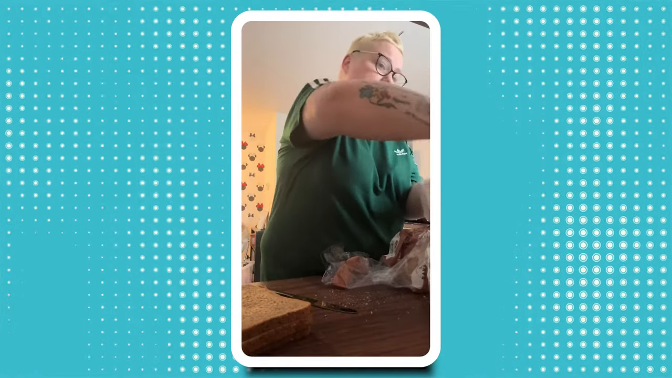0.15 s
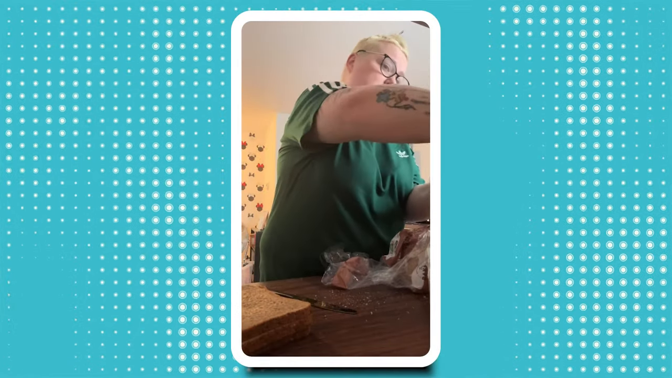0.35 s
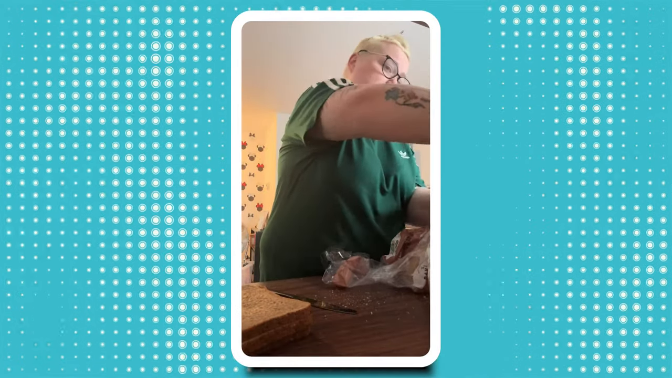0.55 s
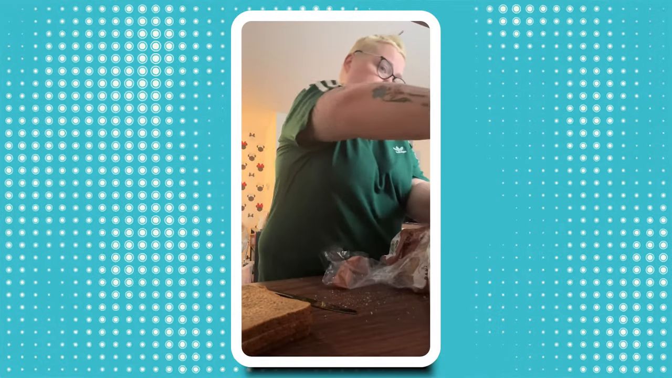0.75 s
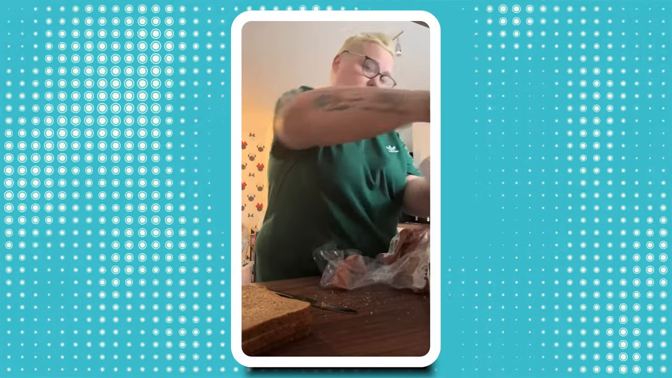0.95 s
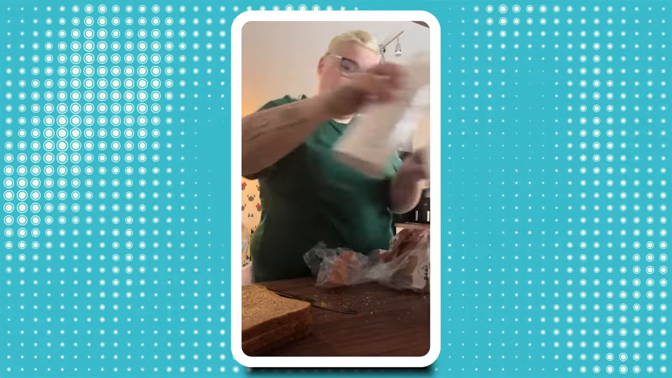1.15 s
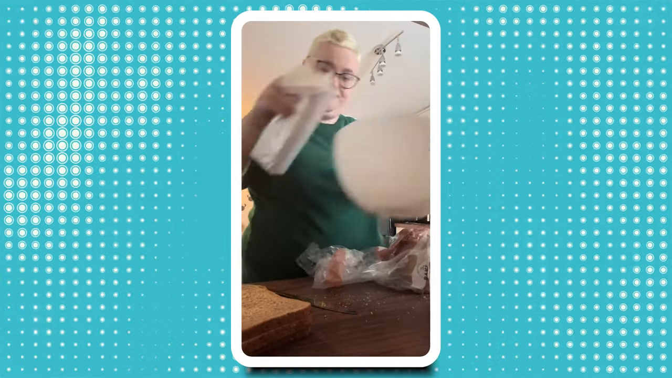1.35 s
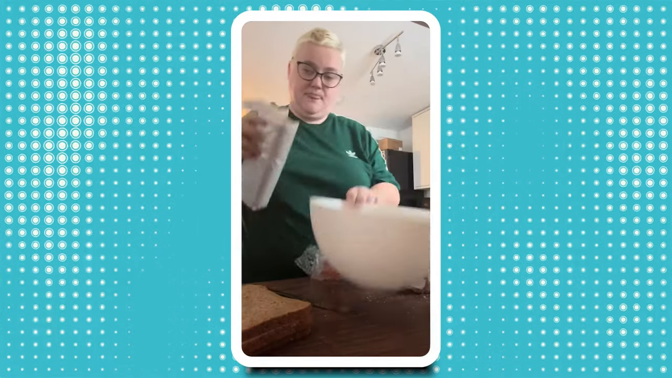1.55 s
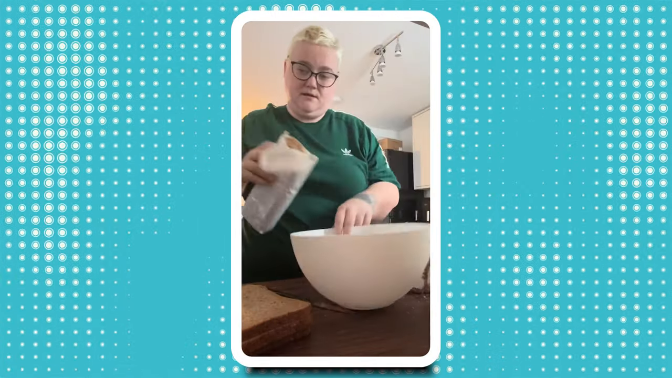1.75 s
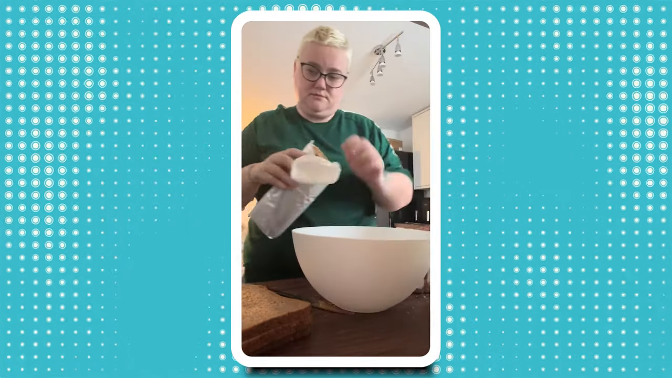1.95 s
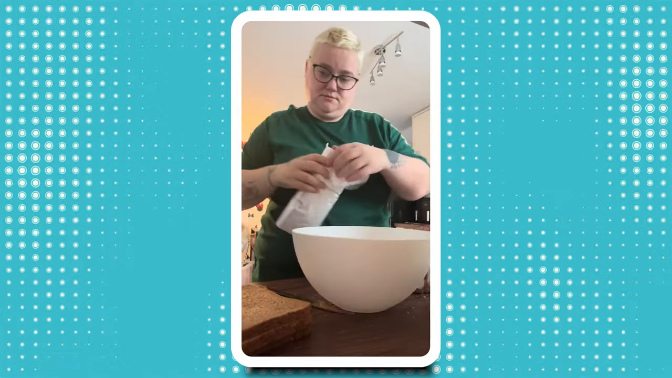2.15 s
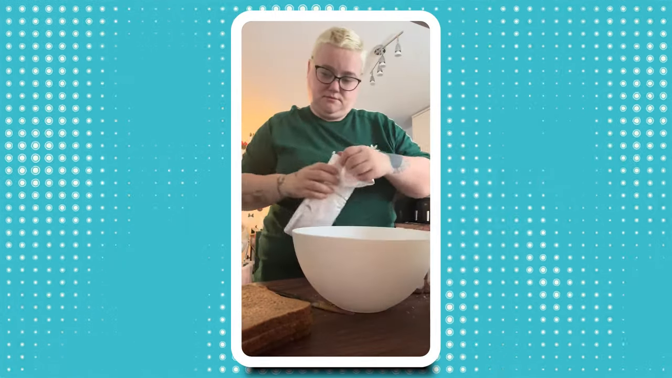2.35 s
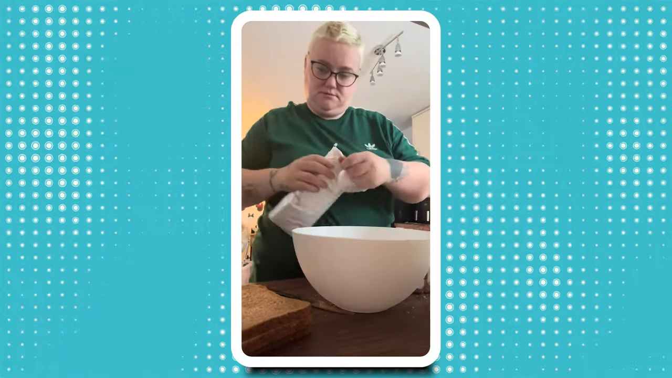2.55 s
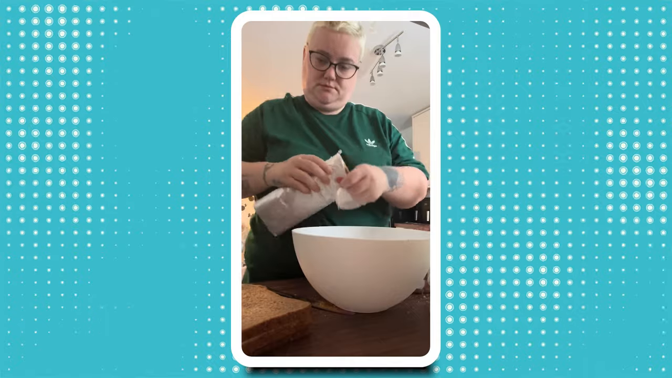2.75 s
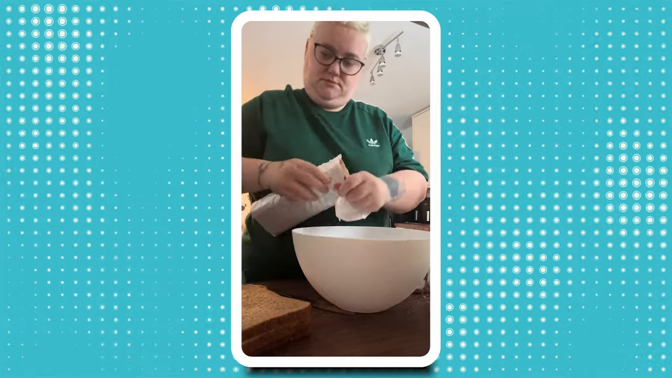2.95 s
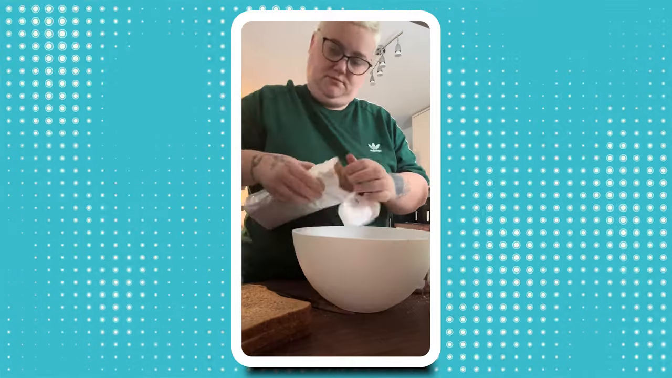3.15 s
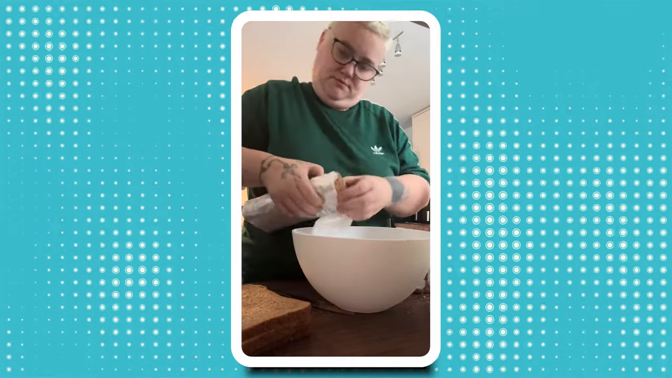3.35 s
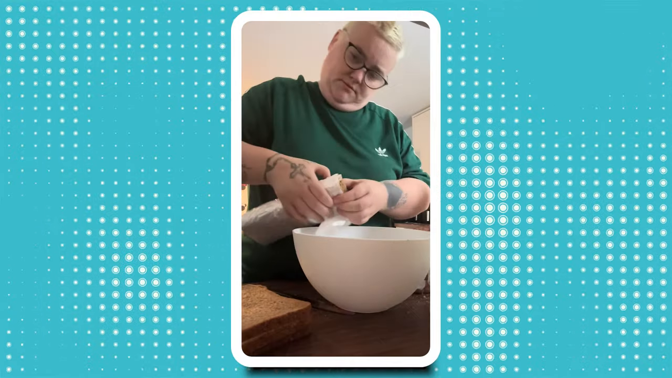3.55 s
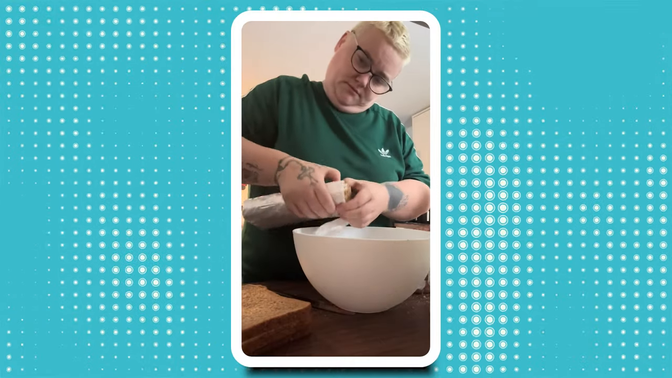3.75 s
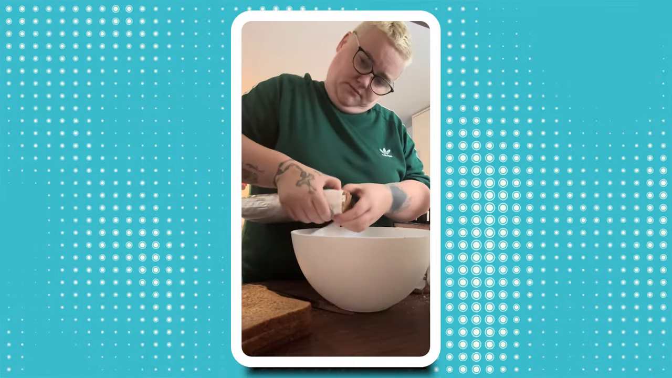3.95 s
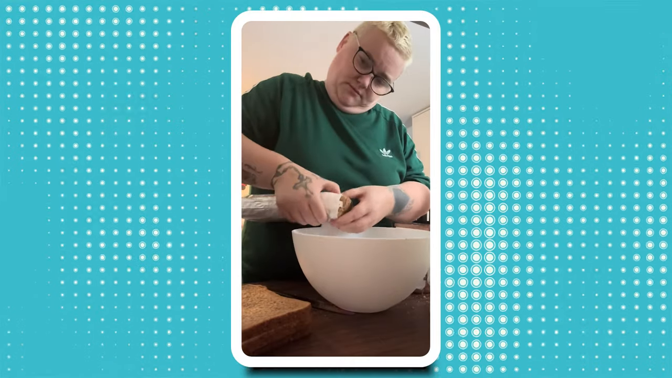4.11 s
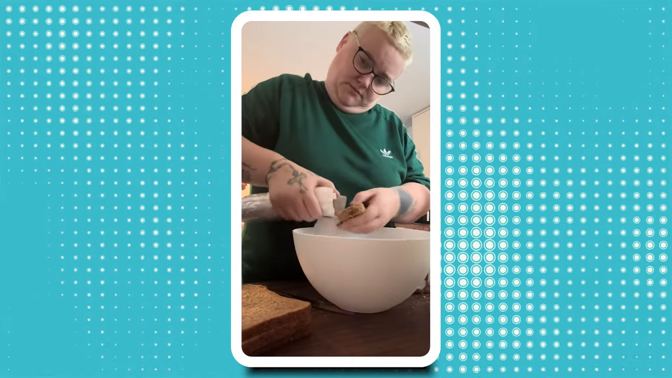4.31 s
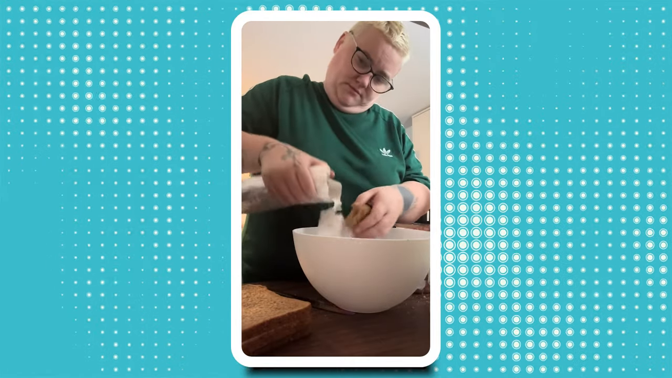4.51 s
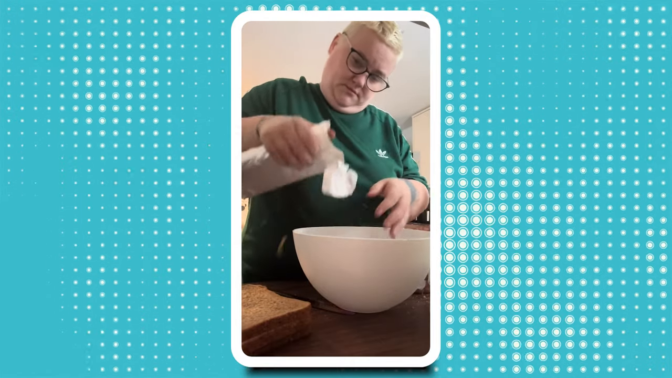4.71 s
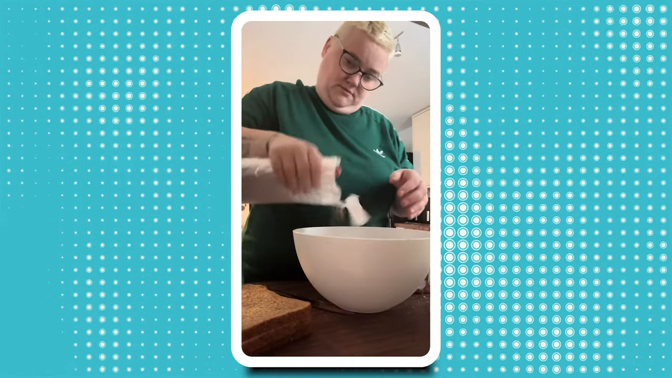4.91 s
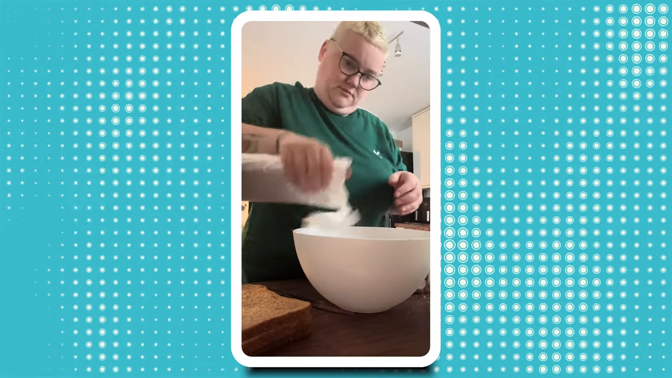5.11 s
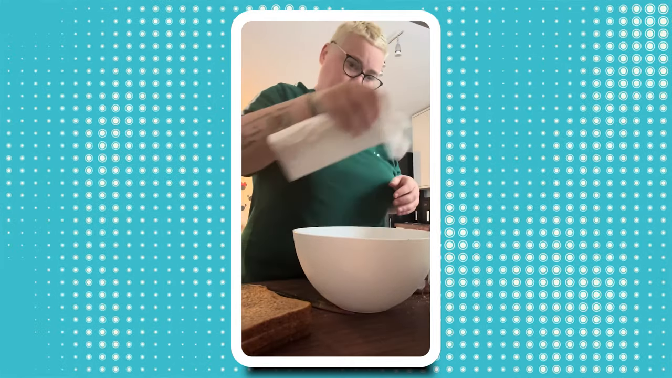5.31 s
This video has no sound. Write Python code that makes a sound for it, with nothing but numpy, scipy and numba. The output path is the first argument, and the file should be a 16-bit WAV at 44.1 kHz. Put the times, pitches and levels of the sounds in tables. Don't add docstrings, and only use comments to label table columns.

```python
import sys
import numpy as np
from scipy import signal
from scipy.fft import rfft, irfft, next_fast_len
from scipy.io import wavfile
from scipy.ndimage import uniform_filter1d
from numba import njit

SR = 44100
rng = np.random.default_rng(int(sys.argv[2]) if len(sys.argv) > 2 else 0)


def gain_from_decibels(decibels):
    exponent = np.asarray(decibels, float) / 20
    return 10 ** exponent


def wrap_up_sound(samples):
    columns = np.atleast_2d(samples).T
    tamed = np.clip(columns, -1, 1)
    steps = np.round(tamed * 32767).astype(np.int16)
    wavfile.write(sys.argv[1], SR, steps)


N = 241491


def colour(x, points):
    hz, db = np.transpose(points)
    size = next_fast_len(N)
    f = np.maximum(np.arange(size // 2 + 1) * SR / size, 1)
    gain = gain_from_decibels(np.interp(np.log(f), np.log(hz), db))
    return irfft(rfft(x, size) * gain, size)[..., :N]


def band(x, lo_hz, hi_hz):
    y = signal.sosfilt(signal.butter(2, [lo_hz, hi_hz], "band", fs=SR, output="sos"), x)
    return y / np.sqrt(np.mean(y ** 2))


@njit
def rings(start, hz, t60, rise, gain):
    out = np.zeros(N)
    for k in range(len(start)):
        turn = np.exp(2j * np.pi * hz[k] / SR - np.log(1000) / (t60[k] * SR))
        z, unrisen = gain[k] + 0j, 1.
        fade = np.exp(-1 / (rise[k] * SR))
        for i in range(int(start[k] * SR), min(N, int((start[k] + t60[k]) * SR))):
            z, unrisen = z * turn, unrisen * fade
            out[i] += (1 - unrisen) * z.imag
    return out


def bursts(s, db, t60, rise):
    env = np.zeros(N + SR)
    t = np.arange(SR // 5) / SR
    for start, g, fall in zip((s * SR).astype(int), gain_from_decibels(db), np.clip(t60, .008, .2)):
        env[start:start + len(t)] += g * (1 - np.exp(-t / rise)) * gain_from_decibels(-60 * t / fall)
    return env[:N]


def grains(lo_hz, hi_hz, cycles, spread_db, count):
    when, pitch, size = rng.random((count, 3)).T
    hz = lo_hz * (hi_hz / lo_hz) ** pitch
    gain = gain_from_decibels(spread_db * np.minimum(-np.log(1 - size), 3.5))
    y = rings(when * N / SR, hz, cycles / hz, .5 / hz, gain)
    return y / np.sqrt(np.mean(y ** 2))


def held(s, length, db, attack, release):
    t = np.arange(N) / SR
    total = 0
    for start, hold, g in zip(s, length, gain_from_decibels(db)):
        end = start + max(hold, attack)
        total = total + g * np.interp(t, [start, start + attack, end, end + release], [0, 1, 1, 0])
    return total


def household_hum():
    # (f/Hz, level/dB)
    spectrum = [(20, -38), (36, 0), (50, 16), (75, 6), (110, 13), (250, -1), (550, -13), (1100, -17),
                (1600, -13.5), (1950, -0.5), (2500, -11.5), (4000, -15), (7000, -19.5), (9000, -14)]
    hum = colour(rng.standard_normal((2, N)), spectrum)
    return hum * gain_from_decibels(-47.5) / np.sqrt(np.mean(hum ** 2))


def kitchen(x, t60=0.25, wet_db=-14):
    t = np.arange(int(.3 * SR)) / SR
    tail = rng.standard_normal((2, len(t))) * gain_from_decibels(-60 * t / t60) * (t > .003)
    tail /= np.sqrt(np.sum(tail ** 2, axis=1, keepdims=True))
    shared, unshared = gain_from_decibels(wet_db) * signal.fftconvolve(x[None], tail, axes=1)[:, :N]
    return shared, gain_from_decibels(11.0) * unshared


def counter():
    # (t/s, peak level/dB, ring f/Hz, t60/s)
    blows = [(0.774, -40, 152, 0.083), (0.797, -34.5, 200, 0.083), (0.811, -37, 210, 0.069),
             (0.825, -34.5, 210, 0.073), (0.931, -24, 118, 0.17), (1.644, -34, 222, 0.1),
             (1.654, -17, 127.4, 0.094), (1.7, -21.5, 135, 0.14), (1.735, -38, 140, 0.1),
             (1.789, -44, 134, 0.24), (1.848, -31.5, 143, 0.44), (1.979, -38, 145, 0.27),
             (2.17, -52, 147, 0.086), (2.398, -32.5, 168, 0.017), (3.078, -48, 94.5, 0.053),
             (3.566, -37, 138, 0.24), (3.62, -37, 136.3, 0.24), (4.135, -31, 128, 0.12),
             (4.615, -17.5, 125.5, 0.08), (4.653, -31.5, 122.6, 0.21), (4.701, -29, 142, 0.1),
             (4.72, -27, 140, 0.093), (4.744, -26, 135.3, 0.098)]
    # (start t/s, length/s, board rumble level/dB, scuff level/dB)
    slides = [
        (0.777, 0.04, -49, -43),
        (0.86, 0.025, -60, -44.5),
        (1.618, 0.13, -39, -43.5),
        (1.826, 0.13, -43.5, -49.5),
        (4.61, .05, -48, -44),
        (4.712, 0.072, -37, -60),
    ]
    s, db, hz, t60 = np.transpose(blows)
    t60 = np.clip(t60, .02, .4)
    thud = rings(s, hz, t60, 0.3 / hz, gain_from_decibels(db + 5))
    thud = thud + rings(s, 1.17 * hz, 1.66 * t60, 0.3 / hz, gain_from_decibels(db - 10.5))
    rumble = band(band(rng.standard_normal(N), 78, 167), 89, 147)
    scuff = grains(190, 235, 10., 2., count=900)
    s, length, rumble_db, scuff_db = np.transpose(slides)
    attack_s, release_s = 0.0084, 0.12
    thud = thud + held(s, length, rumble_db, attack_s, release_s) * rumble
    thud = thud + held(s, length, scuff_db, attack_s, release_s) * scuff
    return colour(thud, [(25, -43.5), (70, 6.0)])


def knocks():
    # (t/s, peak level/dB, ring f/Hz, t60/s)
    taps_and_pops = [(0.178, -44.5, 945, 0.05), (0.922, -33.5, 423, 0.023), (1.361, -35.5, 474, 0.045),
                     (1.408, -38, 436, 0.04), (1.415, -27.5, 424, 0.082), (1.444, -34, 493, 0.081),
                     (1.473, -30, 476, 0.044), (1.645, -13.5, 449, 0.031), (1.694, -12, 466, 0.016),
                     (1.721, -24.5, 433, 0.024), (1.828, -32.5, 620, 0.043), (1.845, -33, 890, 0.035),
                     (1.857, -28, 537, 0.015), (1.971, -37.5, 616, 0.025), (2.35, -37, 450, 0.017),
                     (2.408, -29, 486, 0.016), (2.685, -35.5, 543, 0.016), (2.797, -24, 1150, 0.0056),
                     (2.947, -40.5, 1150, 0.031), (3.08, -37.5, 544, 0.015), (3.238, -40.5, 654, 0.016),
                     (3.439, -28, 684, 0.011), (3.572, -42, 657, 0.033), (3.646, -29.5, 535, 0.015),
                     (4.118, -38, 458, 0.059), (4.198, -33, 665, 0.0093), (4.274, -34.5, 1230, 0.018),
                     (4.307, -47, 534, 0.17), (4.608, -13, 670, 0.0097), (4.663, -40.5, 523, 0.042),
                     (4.699, -35, 694, 0.065), (4.738, -20, 400, 0.015), (5.423, -39.5, 556, 0.012),
                     (0.368, -38, 1010, 0.019), (0.133, -38, 700, 0.01), (0.567, -39.5, 570, 0.014),
            (0.677, -44.5, 850, 0.023), (0.773, -49, 670, 0.069), (0.81, -44, 620, 0.069),
            (0.8502, -21.5, 1700, 0.0082), (1.045, -55, 493, 0.03), (1.15, -56, 447, 0.06),
            (1.235, -54, 510, 0.036), (1.805, -38, 560, 0.035), (0.855, -48, 660, 0.056),
            (0.88, -47, 620, 0.04), (1.748, -37, 960, 0.013), (1.383, -36, 473, 0.05),
            (1.829, -25.5, 2070, 0.078), (1.85, -30, 2070, 0.061), (2.175, -44, 514, 0.063),
            (2.47, -35.5, 1030, 0.015), (2.5, -42.5, 720, 0.025), (2.549, -44, 550, 0.018),
            (2.841, -41.5, 1200, 0.029), (2.961, -43, 812, 0.04), (3.11, -43, 674, 0.025),
            (3.278, -41.5, 620, 0.017), (3.3257, -32, 1780, 0.005), (3.724, -47, 580, 0.054),
            (3.779, -41.5, 647, 0.032), (4.125, -27.5, 1330, 0.018), (4.475, -44, 1120, 0.016),
            (4.495, -44, 1270, 0.024), (4.608, -9.5, 1150, 0.0063), (4.613, -31, 830, 0.035),
            (4.631, -38, 3090, 0.027), (4.753, -34, 560, 0.016), (5.24, -52, 620, 0.018),
            (5.301, -44.5, 580, 0.022), (5.4363, -23.5, 2230, 0.011), (5.436, -28, 5530, 0.0071)]
    s, db, hz, t60 = np.transpose(taps_and_pops)
    t60 = np.clip(t60, .005, .3)
    overtone = rings(s, 1.45 * hz, 0.6 * t60, 1.1 / hz, gain_from_decibels(db - 5))
    return rings(s, hz, t60, 0.42 / hz, gain_from_decibels(db + 8)) + overtone


def bowl(modes, hits):
    s, db, hard_db = np.transpose(hits)
    spot = 2 * rng.random((len(s), len(modes))) - 1
    one = np.ones(len(s))
    out = 0
    for k, (hz, mode_db, t60) in enumerate(modes):
        level = db - 7.0 + mode_db + 2 * spot[:, k - 1] + hard_db * np.log2(hz / 600)
        pitch = hz * (1 + 0.0072 * spot[:, k])
        out = out + rings(s, pitch, min(t60, .044) * one, 0.0013 * one, gain_from_decibels(level))
    return out


def bowl_set_down():
    # (f/Hz, level/dB, t60/s)
    modes = [(312, 8, 0.029), (474, -2, 0.11), (568, -5, 0.062), (795, 2, 0.016), (1150, -16.5, 0.027),
             (2070, -13.5, 0.088), (2624, -4.5, 0.015), (2960, -7.5, 0.0097)]
    # (t/s, peak level/dB, hardness/dB)
    hits = [
        (1.644, -3.5, 4.5),
        (1.694, -10, 4.5),
        (1.72, -27, -3),
    ]
    return bowl(modes, hits)


def biscuit_drop():
    # (f/Hz, level/dB, t60/s)
    modes = [(268, 6.5, 0.078), (495, -5, 0.093), (670, 6, 0.031), (1150, -31, 0.085), (1240, -22, 0.013),
             (1900, -29, .04), (2385, -9, 0.2), (3020, -3.5, 0.012)]
    # (t/s, peak level/dB, hardness/dB)
    hits = [
        (4.607, -9.5, 5),
        (4.633, -20, 9),
        (4.698, -18.5, 4.5),
        (4.736, -24, 10),
    ]
    return bowl(modes, hits)


def grip_gains():
    # (start t/s, length/s, force level/dB, film brightness re force/dB, papery flex re force/dB)
    grips = [(0, 0.037, -44.5, -5, -20), (0.089, 0.19, -46.5, -3.5, -4.5), (0.225, 0.3, -40, -3, -12),
             (0.499, 0.25, -49, -1, -3.5), (0.774, 0.17, -43, -9.5, -7), (0.898, 0.076, -51, -2, -20),
             (0.974, 0.33, -58.5, -8, -2.5), (1.3, 0.23, -46.5, -6, -5.5), (1.477, 0.15, -42.5, -3, 3),
             (1.602, 0.287, -48, -13.5, 9.5), (1.868, 0.16, -54, -40, 1.5), (2.124, 0.22, -40, -1, -2.5),
             (2.315, 0.33, -45, 1, -3), (2.657, 0.44, -49, 2, -6), (2.96, 0.17, -47.5, -7.5, -5),
             (3.169, 0.44, -43, -1, -4.5), (3.55, 0.35, -42.5, 1, -6.5), (3.879, 0.11, -39, 1, -16),
             (4.001, 0.17, -38, 2, -8.5), (4.133, 0.23, -43, -3.5, -2.5), (4.366, 0.18, -49, -0.5, -35),
             (4.562, 0.21, -39.5, -21, -37), (4.781, 0.2, -49.5, 1.5, -39), (5.023, 0.11, -55, 7, -5),
             (5.16, 0.05, -55, 1, -23), (5.33, 0.13, -71.5, 16, -26)]
    s, length, db, film_db, flex_db = np.transpose(grips)
    attack_s, release_s = 0.045, 0.019
    creasing = gain_from_decibels(-66.5) + held(s, length, db, attack_s, release_s)
    sliding = gain_from_decibels(-70.5) + held(s, length, db + film_db, attack_s, release_s)
    flexing = gain_from_decibels(-68) + held(s, length, db + flex_db, attack_s, release_s)
    return creasing, sliding, flexing


def snaps():
    # (t/s, peak level/dB, ring f/Hz, bright edge re peak/dB)
    fetch = [(0.1138, -30.5, 1620, -9), (0.1545, -38, 1620, -30), (0.3465, -20, 1670, -12),
             (0.368, -19.5, 1960, -37), (0.4836, -21.5, 2750, -19), (0.608, -31.5, 1940, -14),
             (0.8004, -25.5, 1790, -53), (0.8495, -25.5, 1730, -36), (0.874, -26, 1900, -49),
             (0.8894, -25.5, 1950, -30), (0.9547, -29, 2070, -30), (1.099, -39, 1970, -35),
             (1.3522, -24, 1980, -22), (1.3697, -32.5, 1920, -36), (1.4133, -24, 1960, -25),
             (1.6364, -20.5, 2140, -20), (1.645, -18.5, 2170, -13.5), (1.6926, -18.5, 1840, -25),
             (1.722, -25, 1930, -28), (1.7614, -25.5, 1750, -43), (1.8152, -23, 2320, -29),
             (1.8277, -11.5, 2070, -19), (1.8444, -31, 1960, -30), (1.9008, -21, 2160, -33),
             (1.9717, -23, 2000, -16)]
    tear = [(2.0986, -30.5, 2070, -8.5), (2.152, -30.5, 2900, -15), (2.168, -23, 1600, -4.5),
            (2.1987, -24, 1900, -25), (2.214, -25.5, 1600, -20), (2.2665, -26.5, 1650, -15),
            (2.3436, -26.5, 1610, -30), (2.383, -26, 4430, -10), (2.4046, -24, 2580, -4),
            (2.419, -20.5, 2560, -19), (2.453, -25.5, 1620, -12), (2.5466, -34, 2290, -9),
            (2.5618, -24, 2210, -14), (2.6089, -27.5, 2140, -13), (2.683, -28.5, 2300, -39),
            (2.742, -31.5, 1960, -3), (2.759, -22.5, 2340, -17), (2.7945, -26.5, 1970, -4.5),
            (2.8857, -22.5, 2720, -13), (2.9486, -24, 2070, -37), (3.193, -25.5, 2870, -11),
            (3.249, -26.5, 1600, -7), (3.2769, -22.5, 1960, -11.5), (3.3251, -20, 1840, -15),
            (3.4392, -17.5, 2020, -14), (3.4672, -19.5, 3250, -15), (3.479, -24.5, 4270, -2.5)]
    pull = [(3.5726, -20.5, 2100, -37), (3.648, -17, 2060, -29), (3.723, -24.5, 1550, -6),
            (3.7443, -25.5, 2700, -6.5), (3.7648, -33, 4470, 6.5), (3.898, -29, 2070, -4.5),
            (3.922, -38, 1900, -38), (4.0921, -21, 2070, -6), (4.115, -18.5, 1910, -7),
            (4.1992, -26, 1610, -12), (4.274, -27, 2200, -14), (4.3064, -18.5, 1990, -18),
            (4.328, -18.5, 1490, -15), (4.396, -34, 1900, -13), (4.432, -25.5, 1790, -41),
            (4.4748, -33, 2120, -20), (4.493, -27, 2380, -20), (4.6083, -8.5, 2160, -14),
            (4.631, -9, 2410, -26), (4.6982, -13, 1890, -13), (4.7354, -12.5, 2240, -13),
            (4.515, -33, 2000, -11), (4.8832, -30, 3030, -12), (5.2384, -29.5, 2300, -8.5),
            (5.284, -29.5, 2210, -10), (5.3004, -21.5, 1830, -11), (5.311, -37.5, 2490, 1),
            (5.423, -33, 2100, -14), (5.4358, -19, 1900, -10.5)]
    small_creases = [(0.0707, -37.5, 1960, -11), (0.1324, -50, 1600, -18), (0.171, -33, 1690, -34),
                     (0.1807, -28, 1710, -17), (0.203, -25.5, 2100, -13), (0.223, -29, 1700, -8),
                     (0.2644, -56, 1940, -23), (0.2952, -27, 2600, -11), (0.4005, -27, 1920, -21),
                     (0.4309, -51, 1960, -19), (0.516, -37.5, 1900, -28), (0.5477, -27.5, 1980, -11),
                     (0.596, -37, 1970, -12), (0.6774, -38.5, 1930, -25), (0.7043, -49, 2040, -25),
                     (0.7392, -32.5, 2050, -14), (0.7731, -34.5, 1820, -7.5), (0.8365, -28, 1920, -34.5),
                     (0.923, -34.5, 1960, -22), (0.986, -31, 1880, -22), (1.4434, -26.5, 2070, -41),
                     (1.4706, -28.5, 1830, -25), (1.506, -48, 2080, -10), (1.5494, -41, 1890, -20),
                     (1.806, -33, 2140, -11), (1.9016, -29, 1820, -13), (2.1256, -42, 2820, -9),
                     (2.2336, -30, 2080, -8), (2.3072, -36, 1700, -26), (2.3944, -29, 2280, -8),
                     (2.468, -33, 1620, -19), (2.5865, -32, 2120, -27), (2.7262, -34, 2100, -10),
                     (2.8194, -42, 2960, -2), (2.8424, -32, 2120, -17), (2.9277, -50, 2170, -4),
                     (2.9845, -27, 1950, -26),
                     (3.0071, -45, 1950, -12), (3.024, -31, 1900, -5), (3.0494, -36, 2710, -12),
                  (3.0749, -39, 2130, 0.5), (3.1103, -31.5, 2110, -17), (3.1423, -31.5, 1240, -20),
                  (3.1632, -38, 1230, -7), (3.2194, -39, 2680, -1), (3.3344, -36.5, 2020, 5),
                  (3.3593, -32.5, 1900, -7), (3.3927, -43, 1900, -28), (3.4274, -35, 2100, -19),
                  (3.4974, -40, 1900, -31), (3.5369, -30, 1770, -19), (3.6316, -39, 2100, -17),
                  (3.6731, -28.5, 1980, -14), (3.8332, -36, 2040, -14), (3.9524, -29, 2000, -6.5),
                  (3.9824, -33, 5700, -5), (4.0138, -28, 1960, -9), (4.0387, -44, 2000, 4),
                  (4.0821, -41, 1940, 3.5), (4.1254, -17, 2190, -19), (4.1494, -24, 2060, -29),
                  (4.6634, -33, 1980, -21), (4.7524, -34, 2000, -29), (4.9344, -38, 2740, -20),
                  (5.0105, -41.5, 1800, 0), (5.0574, -50, 2020, -4), (5.0853, -31, 1900, -28),
                  (5.1244, -37, 1860, -36), (5.215, -39.5, 2040, -13), (5.3682, -38, 1960, -16),
                  (5.4614, -44, 1940, -12)]
    s, db, hz, edge_db = np.transpose(fetch + tear + pull + small_creases)
    t60 = 0.049 * 2 ** (-(db + 21.0) / 66)
    ring = rings(s, hz, 30 / hz, 3.37 / hz, gain_from_decibels(db + 2.5))
    for wait, bend, size in rng.random((4, 3, len(s))):
        near_hz = hz * np.exp(0.23 * (2 * bend - 1))
        crack_db = db - 9 - 7.1 * wait - 3.9 * size
        ring = ring + rings(s + .4 * wait * t60, near_hz, 44 / near_hz, 1.6 / near_hz, gain_from_decibels(crack_db))
    lead_s = 0.0036 * np.clip(-(db + 7.5) / 12, 0, 1)
    body = bursts(s - lead_s, db - 7, 0.89 * t60, 0.006)
    edge = bursts(s - .002, db + edge_db + 5.5, 0.66 * t60, 0.0044)
    return ring, body, edge


def wrapper():
    hiss = rng.standard_normal((3, N))
    crease = grains(1417, 3120, 14., 2., count=4000) + .6 * band(hiss[0], 1300, 3940)
    film = grains(2990, 15430, 40., 1.3, count=9000) + .6 * band(hiss[1], 2300, 12000)
    flex = grains(285.0, 1900, 3.9, 2.0, count=1800) + .5 * band(hiss[2], 410, 960)
    jerks = [bursts(at * N / SR, -5 - 10 * size, 0.043 + 0 * at, 0.0012)
             for at, size in rng.random((4, 2, 200))]
    slip = 0.52 + 0.5 * jerks[0] + 0.51 * np.array(jerks[1:])
    creasing, sliding, flexing = grip_gains()
    ring, body, edge = snaps()
    out = ring + (creasing * slip[0] + body) * crease
    out = out + (gain_from_decibels(0.5) * sliding * slip[1] + edge) * film
    return out + (gain_from_decibels(-0.5) * flexing * slip[2] + 0.44 * body) * flex


def pockets(x):
    # (f/Hz, width/Hz, level/dB)
    cavities = [(620, 89, -13.5), (1960, 114, -6.5), (2710, 71, 2), (4235, 230, -3.5), (5460, 200, -4.5)]
    return x + sum(gain_from_decibels(db) * signal.lfilter(*signal.iirpeak(hz, hz / width, fs=SR), x)
                   for hz, width, db in cavities)


def brought_over(packet):
    # (f/Hz, level/dB)
    reach = [(500, -1.5), (900, 4.5), (1300, -1), (1700, 0), (2100, -2.5), (2600, -0.5), (3200, 1),
             (3900, 2.5), (6900, 0), (7300, -16), (9000, 3)]
    far = np.interp(np.arange(N) / SR, [0.76 - .05, 0.76 + 0.044], [1, 0])
    return far * colour(packet, reach) + (1 - far) * packet


def squelch(x, lo_hz, hi_hz, open_db, frame_s=0.016):
    sos = signal.butter(6, [lo_hz, hi_hz], "band", fs=SR, output="sos")
    part = signal.sosfiltfilt(sos, x)
    power = uniform_filter1d(np.mean(part ** 2, axis=0), int(frame_s * SR))
    return x - part / (1 + (power / gain_from_decibels(2 * open_db)) ** 2)


def scene():
    # (f/Hz, level/dB)
    apart = [(100, -89), (400, -50), (1000, -3.5), (2000, -9), (4000, -2.5), (7000, -3.5), (14000, -1)]
    packet = gain_from_decibels(-1.0) * pockets(wrapper())
    near = brought_over(packet) + knocks() + bowl_set_down() + biscuit_drop()
    shared, unshared = kitchen(near)
    hum = household_hum()
    side = colour(unshared + hum[1], apart)
    mid = near + shared + hum[0] + counter()
    return np.array([mid + side, mid - side])


def low_pass(x):
    return signal.sosfilt(signal.butter(12, 15860, fs=SR, output="sos"), x)


def record(dry):
    # (f/Hz, level/dB)
    mic = [(30, -14), (50, -7), (300, -6.5), (550, 4), (950, 2.5), (1350, -3), (2030, -1), (2350, -2.5),
           (2730, -3), (3500, -4), (4160, -3), (4850, -5), (5600, -3), (6400, -7), (7200, -9.5)]
    # (f/Hz, level/dB)
    top_loss = [(7100, -1.5), (7500, -12), (7750, -20), (8900, -19), (9200, -14), (13800, -15),
                (14700, -11.5), (15900, -62.5)]
    # (f/Hz, left minus right/dB)
    balance = [(60, -0.4), (110, -0.5), (200, -2.5), (380, -6), (700, -5), (1290, -4.5), (2380, 0.5),
               (4400, -1), (8120, 0.5), (15000, -1.5)]
    lean = np.array(balance, float)
    ports = np.array([colour(x, lean * [1, sign / 2]) for x, sign in zip(dry, (1, -1))])
    ports = .6 * np.tanh(colour(ports, mic) / .6)
    ports = colour(ports, top_loss)
    ports = squelch(ports, 7650, 9000, -79)
    ports = squelch(ports, 9000, 16500, -80)
    return low_pass(ports)


dry = scene()
out = record(dry)
wrap_up_sound(out)
```